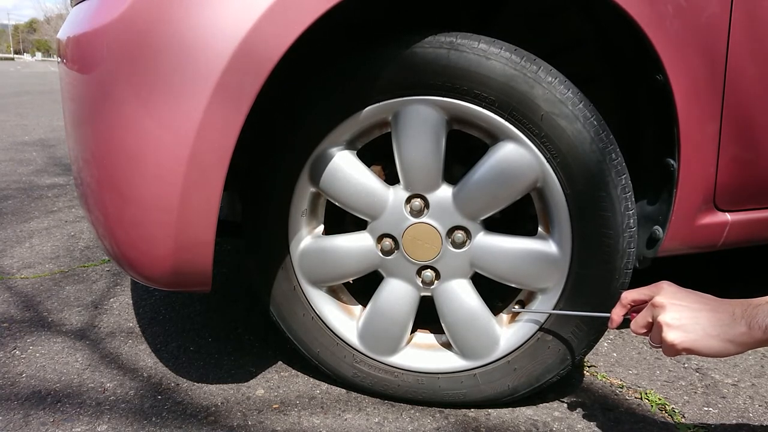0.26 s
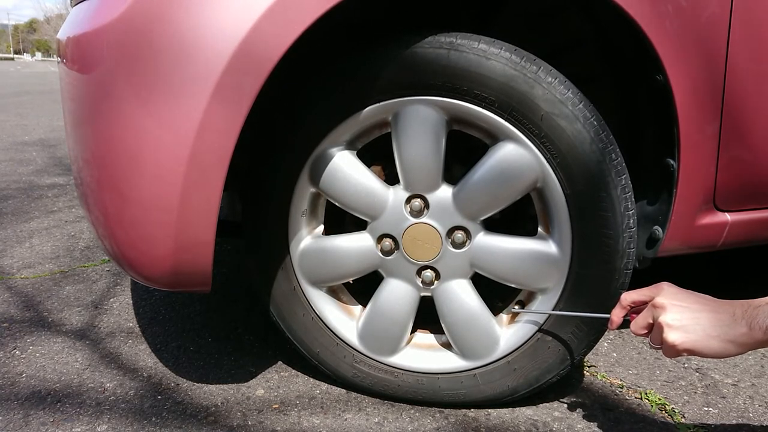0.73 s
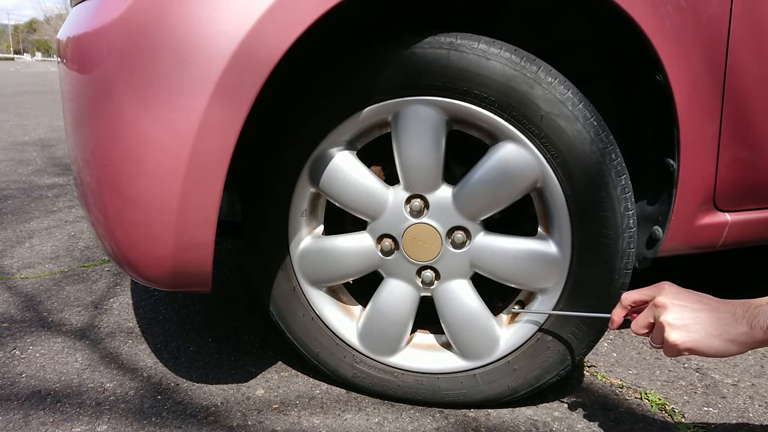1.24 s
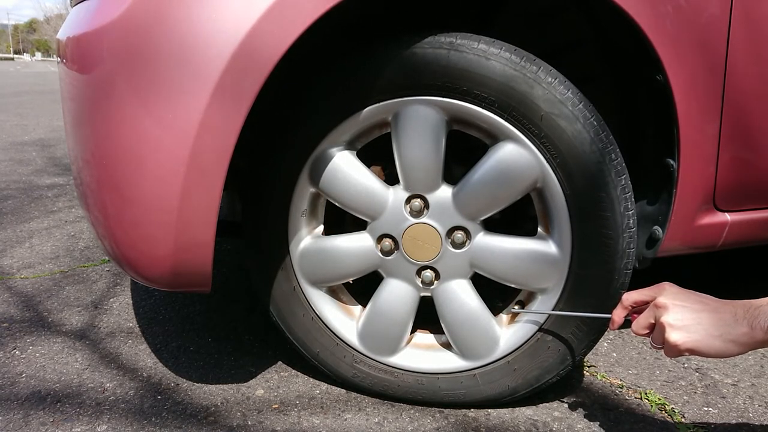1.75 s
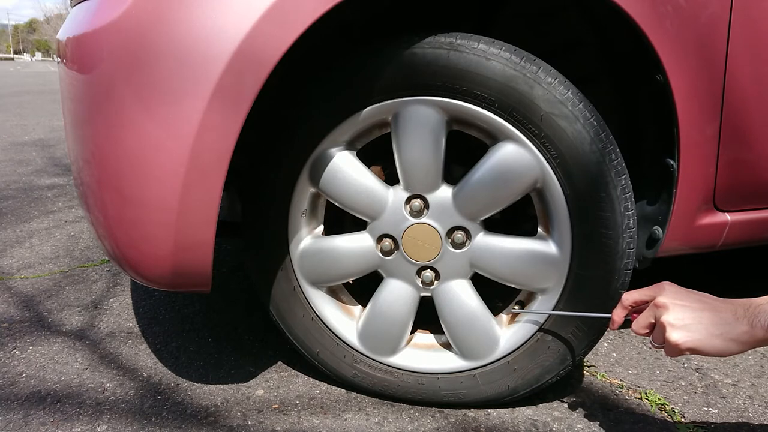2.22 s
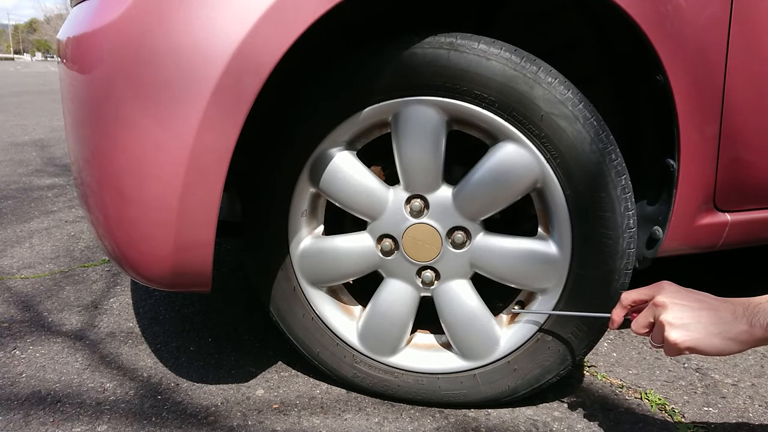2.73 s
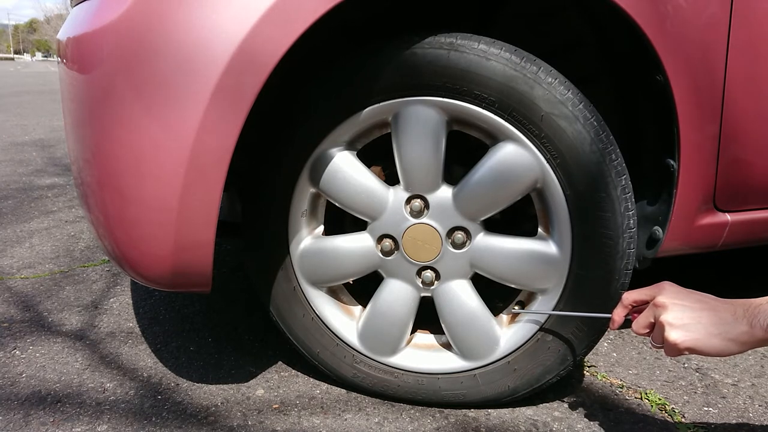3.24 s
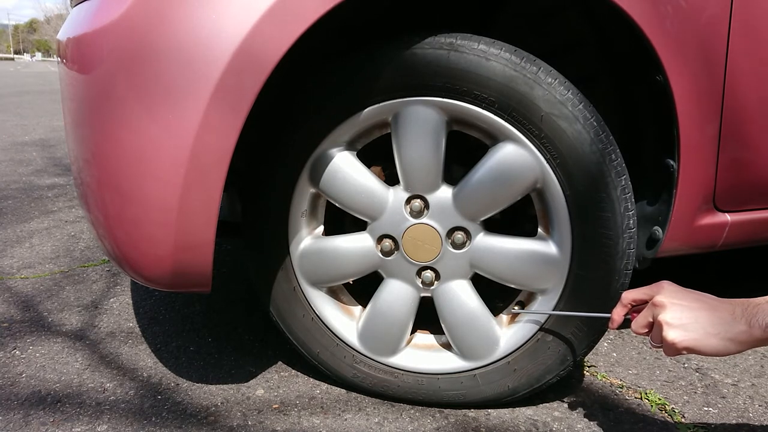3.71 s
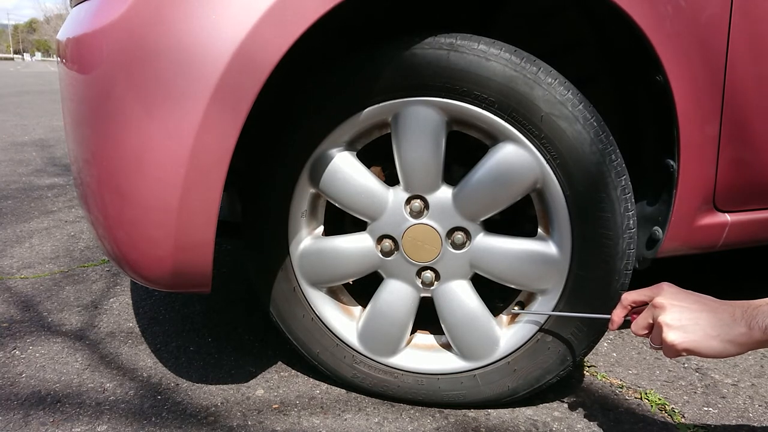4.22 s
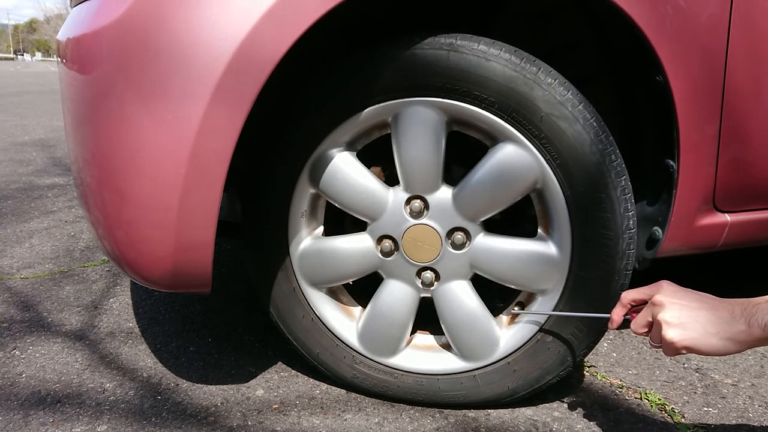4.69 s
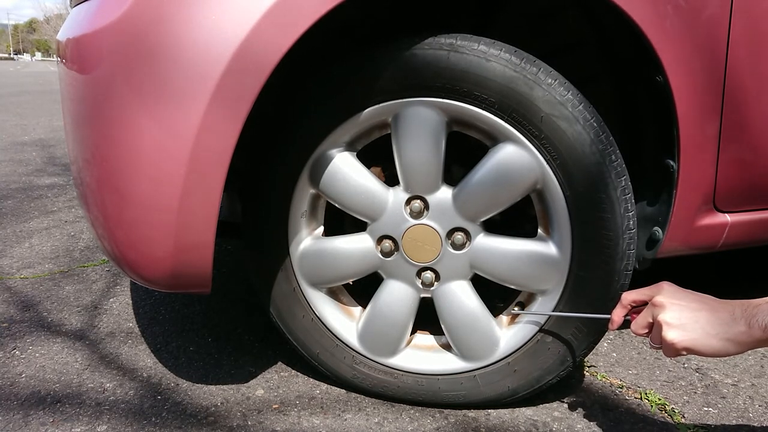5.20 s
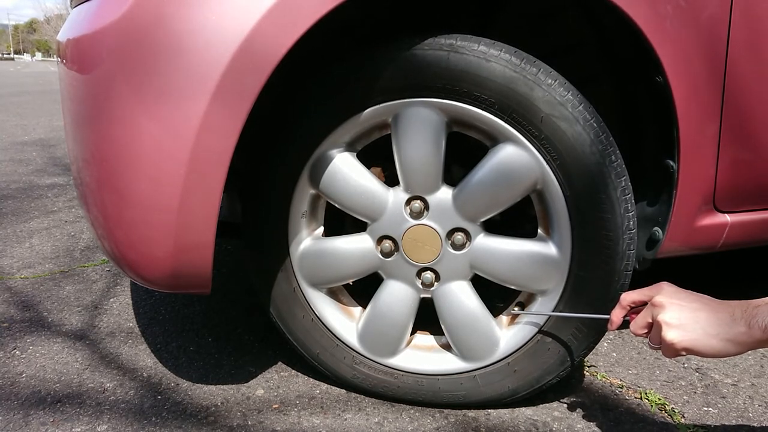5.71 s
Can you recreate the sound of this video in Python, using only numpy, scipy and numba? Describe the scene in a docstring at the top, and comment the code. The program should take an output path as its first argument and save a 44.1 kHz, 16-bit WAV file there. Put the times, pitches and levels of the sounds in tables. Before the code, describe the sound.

Outdoors, close to a car wheel, air is let out of the tyre valve in bursts, recorded in stereo by a phone. The jet is a dry, bright, high-frequency hiss with little body, already sounding at the start and shutting at 0.4 s. A short burst follows from 0.6 to 0.8 s, then near quiet with faint background hiss and light wind. Further bursts run 1.5 to 1.7 s and 2.0 to 2.2 s, then a longer one from 2.5 to 3.1 s. After a tiny gap, a long steady hiss lasts from 3.2 to 5.4 s, and the last starts near 5.65 s and continues to the end. Onsets are quick and cut-offs sharp, with slight close echoes. Low wind rumble and dull thumps buffet the microphones, often on the left, strongest around 2.3 to 3.4 s and after 5 s, calmer around 4.5 s.

```python
"""Air jets in bursts from a car tyre valve, close to a phone, as a hand pushes a thin rod onto the pin.
The jet is shaped noise, throttled by the pin and echoed by the wheel arch, ground and surroundings.
Wind buffets the phone's two microphone ports separately: a low roll, small eddies and single hard puffs.
Behind it all lies a faint, steady hiss."""
import sys
import numpy as np
from scipy import signal
from scipy.fft import rfft, irfft
from scipy.io import wavfile
from scipy.ndimage import uniform_filter1d, map_coordinates
from numba import njit

SR = 44100
rng = np.random.default_rng(int(sys.argv[2]) if len(sys.argv) > 2 else 0)


def transcribe(signal):
    """Save signal, clipped to [-1, 1], as a 16-bit WAV file at the path in sys.argv[1]."""
    frames = np.atleast_2d(signal).T
    limited = np.clip(frames, -1, 1)
    pcm = np.round(limited * 32767).astype(np.int16)
    wavfile.write(sys.argv[1], SR, pcm)


N = 262395  # samples

# Background hiss colour, overall level set apart: pitch_hz, relative_density_db
HISS_COLOUR = [(100, 19), (400, 15), (800, 10), (1500, 2), (3000, 0.5), (5000, 3), (6500, -1), (8000, 0),
               (11000, -6.5), (13000, -26), (15500, -27)]
# Steady breeze: time_s, left_gain_db, right_gain_db, extra_eddy_db
BREEZE_COURSE = [(.05, -41, -33, 1), (.25, -49, -33, 2), (.45, -38, -30, -1), (.65, -32, -38, 0),
                 (.9, -36, -40, -2), (1.15, -35, -40, 3), (1.5, -34, -40, 0), (1.85, -43, -41, -3),
                 (2.05, -33, -45, -3), (2.3, -25.5, -44, 2), (2.55, -28, -27, 2), (2.75, -30, -29, 3),
                 (3.0, -32, -34, 1), (3.3, -32, -30, 0), (3.75, -39, -39, -1), (3.95, -36, -41, -2),
                 (4.35, -38, -44, -3), (4.6, -45, -48, -3), (4.75, -39, -51, -6), (4.98, -39, -44, -4),
                 (5.15, -30, -52, -3), (5.4, -30, -40, -3), (5.65, -26, -33, 1), (5.95, -23, -30, 1)]
# Gusts over the breeze: peak_s, peak_gain_db, left_minus_right_db, time_to_fall_10_db_s
GUST_PEAKS = [(.57, -35, -10, .05), (.75, -33, 8, .07), (1.02, -38, -8, .05), (1.27, -39, -8, .05),
              (1.35, -34, 15, .08), (1.6, -29, 20, .1), (1.7, -28, 24, .07), (2.14, -28.5, 23, .06),
              (2.47, -31, 10, .06), (2.67, -31, -8, .07), (2.86, -30, 16, .07), (3.23, -27, 10, .07),
              (3.38, -32, -10, .08), (3.55, -32, 12, .07), (4.03, -38, -3, .06), (4.24, -38, 4, .06),
              (4.43, -40, 17, .06), (4.94, -43, -8, .05), (5.05, -27, 30, .12), (5.31, -33, 2, .06),
              (5.37, -32, 20, .05), (5.45, -28, 20, .05), (5.58, -23, 14, .05), (5.67, -31, -6, .05),
              (5.78, -26, 12, .08), (5.92, -21, 10, .04)]
# Single hard puffs: start_s, peak_db (before the split between ports), left_minus_right_db
HARD_PUFFS = [(0.192, -26, -23), (0.48, -26, -17.5), (0.665, -31, 11), (1.044, -32, 11), (1.58, -24, 12.5),
              (2.137, -31, 19.5), (2.272, -24, 29), (2.356, -27, 17), (2.472, -19, 14), (2.581, -20, -1),
              (2.666, -24, 5), (2.749, -29, .5), (2.809, -23, 9), (2.879, -28, -6.5), (3.223, -24, 4),
              (3.351, -21, -17), (4.054, -30, 7), (5.044, -26, 29), (5.081, -29, 21), (5.124, -29, 24),
              (5.418, -27, 13.5), (5.532, -25, 3), (5.569, -22, 11.5), (5.608, -26, 2.5), (5.66, -22, -4.5),
              (5.809, -19, 4), (5.905, -16, 18.5)]
# One row a push on the pin: opens_s, leak_before_s, seal_break_s, reach_full_flow_s, shuts_s,
# ease_before_shut_s, jet_level_db (before throttling and echoes), dribble_after_shut_s
PIN_PUSHES = [(-.3, .001, .018, .05, .398, .04, -25, .045), (.584, .001, .02, .076, .83, .065, -24.3, .001),
              (1.49, .045, .03, .11, 1.727, .018, -25.3, .001),
              (1.969, .001, .012, .026, 2.194, .045, -26.3, .001),
              (2.472, .001, .02, .024, 3.097, .022, -25.7, .001),
              (3.22, .001, .012, .024, 5.42, .03, -24.2, .001),
              (5.646, .001, .02, .07, 6.3, .05, -25.5, .001)]
# Jet colour on its way to each port, overall level set apart: pitch_hz, relative_density_db
JET_COLOUR_LEFT = [(500, -30), (1300, -35.5), (2400, -25), (3700, -13.5), (4100, -13), (6600, -14),
                   (7900, -14), (9000, -6.5), (10600, 1), (11900, -12), (12900, -5.5), (13800, -6),
                   (14700, -10.5), (15600, -6)]
JET_COLOUR_RIGHT = [(500, -38.5), (1300, -37), (2400, -25.5), (3600, -16), (4600, -21.5), (6400, -13),
                    (7700, -11), (9000, -10), (10400, -20.5), (11200, -6), (12200, -10.5), (13000, -3),
                    (14200, -6), (14900, 4), (15700, -15.5)]
# Narrow peaks and dips from reflections off rim and phone body: pitch_hz, width_hz, gain_db
REFLECTIONS_LEFT = [(3400, 150, -3), (3520, 135, 1), (6620, 250, 0), (8420, 290, 5), (9680, 300, 0.5),
                    (10340, 220, -1.5), (10960, 210, 4), (12700, 350, -2.5), (12740, 250, 3.5),
                    (14000, 250, 2), (14720, 350, -6.5), (15500, 200, 2)]
REFLECTIONS_RIGHT = [(4670, 150, -11), (5330, 150, -8.5), (5500, 150, 5), (6020, 150, -15), (9070, 290, 5),
                     (10200, 200, 3), (10500, 252, -3), (10700, 200, 2), (11700, 200, 3), (14300, 200, -6),
                     (14370, 200, 3), (15700, 200, 5)]
# The jet compared between ports: pitch_hz, right_lead_radians, likeness_0_to_1
PORT_LIKENESS = [(500, -0.6, 0.54), (3270, 0.03, 0.81), (4320, 1.28, 0.3), (5320, 1.5, 0.55),
                 (6320, 5, 0.64), (6820, 3.5, 0.69), (8260, 3, 0.73), (8800, 4.5, 0.4), (10300, 4.0, .65),
                 (10980, 5, .8), (12200, 6.3, 0.4), (13800, 5.6, 0.84), (14400, 6.5, 0.3),
                 (14800, 4.9, 0.64), (15700, 4.5, 0.73)]
# A barely open pin thins the jet unevenly: band_top_hz, extra_loss_db_per_db_of_throttling
PIN_THINNING = [(2500, 0.42), (5800, 0.28), (7300, -0.4), (12300, 0.12), (17000, 0.1)]
# Resonances and notches of each microphone port: pitch_hz, width_hz, gain_db
PORT_RESONANCES_LEFT = [(5690, 840, 6)]
PORT_RESONANCES_RIGHT = [(5790, 460, -49), (5400, 900, -7), (6560, 680, 10)]

# Hiss: rms level at the left port, and the right port against it
HISS_DB, HISS_RIGHT_DB = -56, -4

# Wind: the roll's level is against the wind gain
ROLL_HZ, ROLL_DAMP, ROLL_FLICKER_DB, ROLL_DB = 69.9, 0.83, 2, 3.3
EDDIES_PER_S, EDDY_SPREAD_DB = 110, 2.8  # mean rate; mean of the random size above the smallest
EDDY_HZ_LEFT, EDDY_HZ_RIGHT = 162, 189  # corners at a wind gain of -30 dB
EDDY_DB_LEFT, EDDY_DB_RIGHT = -11.5, -5  # against a wind gain of -30 dB
EDDY_OCTAVES_PER_DB, EDDY_DB_PER_DB = .02, .05  # corner and extra level gained as the wind grows
GUST_RISE_S = .025  # time to rise the last 10 dB
WAVER_DB, WAVER_RATE_HZ = 1.2, 10  # the breeze wavers at each port on its own
PUFF_S = .0086

# Pin and seal: flow levels are against each push's jet level
LEAK_DB, CRACK_DB = -38, -8  # faint leak before the seal breaks; flow just after it breaks
SINK_POWER = .7  # under 1: the flow gains most at first
EASED_DB, SHUT_S = -7, .009  # flow as the seal touches; time to drop to a dribble
DRIBBLE_DB, DRIBBLE_SAG_DB = -18, -2
SEAT_S, SEATED_DB, FADE_S, CLOSED_DB = .01, -37, .07, -50  # the seal seats and the last leak dies away

# Jet on its way to the phone
FULL_FLOW_DB = -25  # jet level below which the pin thins the bands
PATCH_DB, PATCH_HZ, PATCH_S = 2, 250, .06  # narrow patches of the jet swell and fade
ARCH_DB, ARCH_T60_S = -15, .02  # close echoes off rim, arch and ground, against the jet
YARD_DB, YARD_T60_S = -20.5, .2  # longer echoes from the surroundings

# Phone
BASS_CUT_HZ, TOP_HZ = 52.8, 15760


def undb(db):
    """Turn dB into an amplitude ratio."""
    return 10 ** (np.asarray(db) / 20)


def level(x, db):
    """Scale to an rms level in dB."""
    return x * undb(db) / np.sqrt(np.mean(x ** 2))


def over_hz(table, column=1):
    """A table column at every Fourier bin, joined on a log-frequency axis."""
    table = np.array(table, float)
    hz = np.fft.rfftfreq(N, 1 / SR) + 1  # the 1 avoids log(0)
    return np.interp(np.log(hz), np.log(table[:, 0]), table[:, column])


def over_time(table, column=1):
    """A table column at every sample."""
    table = np.array(table, float)
    return np.interp(np.arange(N) / SR, table[:, 0], table[:, column])


def walk(rate):
    """Random levels held 1 / rate s, then smoothed twice; spread near 1."""
    hold = int(SR / rate)
    steps = np.repeat(rng.standard_normal(N // hold + 1), hold)
    return 1.3 * uniform_filter1d(uniform_filter1d(steps, hold), hold)[:N]


def bumps(table):
    """Summed bell-shaped peaks and dips in dB at every Fourier bin."""
    hz = np.fft.rfftfreq(N, 1 / SR)
    return sum(db * np.exp(-(2 * (hz - centre) / width) ** 2) for centre, width, db in table)


def shares(pan_db):
    """Left and right gains of two unrelated sounds whose mean has level 0 dB."""
    return 2 / np.sqrt(1 + undb(2 * np.array([-pan_db, pan_db])))


@njit
def lowpass(x, hz, damp):
    """State-variable low-pass whose corner moves every sample."""
    y, band, low = np.empty(len(x)), 0., 0.
    for i in range(len(x)):
        g = np.tan(np.pi * hz[i] / SR)
        v = (band + g * (x[i] - low)) / (1 + g * (g + damp))
        y[i] = low + g * v
        band, low = 2 * v - band, 2 * y[i] - low
    return y


def background_hiss():
    """Smooth distant hiss: shaped noise, unrelated at the two ports."""
    hiss = irfft(rfft(rng.standard_normal((2, N))) * undb(over_hz(HISS_COLOUR)), N)
    return level(hiss, HISS_DB) * undb([[0], [HISS_RIGHT_DB]])


def wind_gain():
    """Wind gain at each port: breeze and gusts add their power."""
    t = np.arange(N) / SR
    breeze_db = [over_time(BREEZE_COURSE, column=k) + WAVER_DB * walk(WAVER_RATE_HZ) for k in (1, 2)]
    power = undb(np.array(breeze_db)) ** 2
    for peak_s, db, pan_db, fall_s in GUST_PEAKS:
        below_db = 10 * np.maximum((peak_s - t) / GUST_RISE_S, (t - peak_s) / fall_s)
        power = power + (undb(db - below_db) * shares(pan_db)[:, None]) ** 2
    return np.sqrt(power)


def rolling_pressure():
    """Broad rolling rumble: low-passed noise with a drifting corner and a flickering level."""
    hz = ROLL_HZ * 2 ** (0.16 * walk(6))
    rumble = lowpass(lowpass(rng.standard_normal(N), hz, ROLL_DAMP), 2.0 * hz, 1.25)
    return level(rumble * undb(ROLL_FLICKER_DB * walk(20)), ROLL_DB)


def small_eddies(above_db, corner_hz, eddy_db):
    """Small eddies strike a port as random low-passed pulses, shorter and stronger as the wind grows."""
    hit, sign, size = rng.random((3, N))
    strikes = (hit < EDDIES_PER_S / SR) * np.sign(sign - .5)
    strikes = strikes * undb(-EDDY_SPREAD_DB * np.log(1 - size))
    hz = corner_hz * 2 ** (EDDY_OCTAVES_PER_DB * above_db)
    pulses = lowpass(lowpass(strikes, hz, 1.01), 1.89 * hz, 1.65)
    pulses = pulses / np.sqrt(hz)  # same power however short
    extra_db = EDDY_DB_PER_DB * above_db + over_time(BREEZE_COURSE, column=3)
    return level(pulses, eddy_db) * undb(extra_db)


def wind():
    """Moving air presses on each port separately, as a low roll with small eddies on top."""
    corners_hz, eddy_levels_db = (EDDY_HZ_LEFT, EDDY_HZ_RIGHT), (EDDY_DB_LEFT, EDDY_DB_RIGHT)
    ports = []
    for gain, corner_hz, eddy_db in zip(wind_gain(), corners_hz, eddy_levels_db):
        above_db = 20 * np.log10(gain) + 30  # wind against -30 dB
        ports.append(gain * (rolling_pressure() + small_eddies(above_db, corner_hz, eddy_db)))
    return np.array(ports)


def puffs():
    """Each hard puff swings the pressure at both ports, up or down at random, then weakly back."""
    out, u = np.zeros((2, N + SR)), np.linspace(0, 1, int(PUFF_S * SR))
    swing = np.sin(2 * np.pi * u) * np.sin(np.pi * u) * np.exp(-.8 * u)
    swing = swing / swing.max()
    for start_s, db, pan_db in HARD_PUFFS:
        start = int(start_s * SR)
        polarity = np.sign(rng.random() - .5)
        out[:, start:start + len(u)] += polarity * undb(db) * shares(pan_db)[:, None] * swing
    return out[:, :N]


def echoes(db, t60):
    """Two unrelated decaying noise responses, one for each port, starting after 0.5 ms."""
    t = np.arange(SR // 2) / SR
    tail = rng.standard_normal((2, len(t))) * 1000. ** (-t / t60) * (t > .0005)
    return undb(db) * tail / np.sqrt(np.sum(tail ** 2, axis=1, keepdims=True))


def patchy(x):
    """Moving air between valve and phone lets narrow bands waver on their own."""
    hz, s, frames = signal.stft(x, SR, nperseg=512)
    coarse = rng.standard_normal((200, 400))
    places = np.meshgrid(hz / PATCH_HZ, s / PATCH_S, indexing="ij")
    field = map_coordinates(coarse, places, order=1, mode="wrap")
    return signal.istft(frames * undb(PATCH_DB * field), SR, nperseg=512)[1][:, :N]


def valve_flow():
    """Jet level in dB: the seal cracks open, the pin sinks, holds, eases back, and the seal shuts."""
    pushes, t = [], np.arange(N) / SR
    for opens, leak, crack, push, shuts, ease, db, dribble in PIN_PUSHES:
        cracks, seats = opens - crack, shuts + SHUT_S + dribble
        seal_db = over_time([(cracks - 2 * leak, CLOSED_DB), (cracks - leak, LEAK_DB), (cracks, LEAK_DB),
                             (opens, 0), (shuts - ease, 0), (shuts, EASED_DB),
                             (shuts + SHUT_S, DRIBBLE_DB), (seats, DRIBBLE_DB + DRIBBLE_SAG_DB),
                             (seats + SEAT_S, SEATED_DB), (seats + SEAT_S + FADE_S, CLOSED_DB)])
        sunk = np.clip((t - opens) / push, 0, 1) ** SINK_POWER
        broken = np.clip((t - cracks) / crack, 0, 1)
        pushes.append(db + seal_db + CRACK_DB * (1 - sunk) * broken)
    return np.max(pushes, axis=0)


def jet_spectra():
    """Spectra of turbulent jet noise at the two ports, partly shared and coloured by each path."""
    shared, own = rfft(rng.standard_normal((2, N)))
    like = np.clip(over_hz(PORT_LIKENESS, column=2), 0, 1)
    right = like * shared * np.exp(1j * over_hz(PORT_LIKENESS)) + np.sqrt(1 - like ** 2) * own
    return np.array([shared * undb(over_hz(JET_COLOUR_LEFT) + bumps(REFLECTIONS_LEFT)),
                     right * undb(over_hz(JET_COLOUR_RIGHT) + bumps(REFLECTIONS_RIGHT))])


def jet():
    """Turbulent air from the valve, throttled band by band by the pin, with patches and echoes."""
    spectra, flow_db = jet_spectra(), valve_flow()
    throttle_db = np.clip(flow_db - FULL_FLOW_DB, -30, 0)
    scale = np.sqrt(np.mean(irfft(spectra.mean(0), N) ** 2))  # rms of the two ports' mean
    hz, low, out = np.fft.rfftfreq(N, 1 / SR), 0, 0
    for top, loss in PIN_THINNING:
        band = irfft(spectra * ((hz >= low) & (hz < top)), N) / scale
        flutter_db = .5 * walk(12) + 0.48 * walk(2)  # each band wavers on its own
        out = out + band * undb(flow_db + loss * throttle_db + flutter_db)
        low = top
    out = patchy(out)
    response = echoes(ARCH_DB, ARCH_T60_S) + echoes(YARD_DB, YARD_T60_S)
    return out + signal.fftconvolve(out, response, axes=1)[:, :N]


def scene():
    """Hiss, wind, puffs and jet as they reach the two ports."""
    return background_hiss() + wind() + puffs() + jet()


def record(dry):
    """Each port has its own resonances; the phone cuts the deep bass and the top."""
    gains = undb([bumps(PORT_RESONANCES_LEFT), bumps(PORT_RESONANCES_RIGHT)])
    responses = np.roll(irfft(gains, N), 1024, axis=1)[:, :2049]  # centred, so without delay
    padded = np.pad(dry, ((0, 0), (1024, 1024)), "reflect")
    x = signal.fftconvolve(padded, responses, "valid", axes=1)
    x = signal.sosfilt(signal.butter(4, BASS_CUT_HZ, "high", fs=SR, output="sos"), x)
    return signal.sosfilt(signal.ellip(16, .3, 70, TOP_HZ, fs=SR, output="sos"), x)


dry = scene()
out = record(dry)
transcribe(out)
```